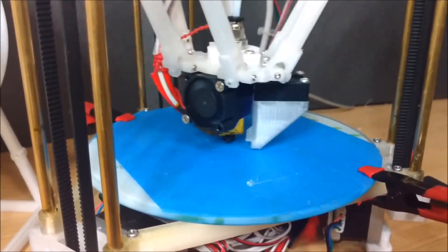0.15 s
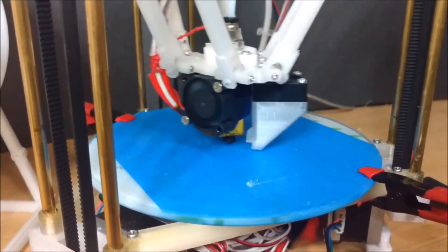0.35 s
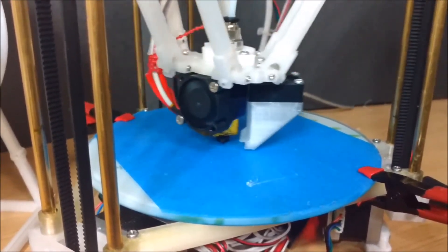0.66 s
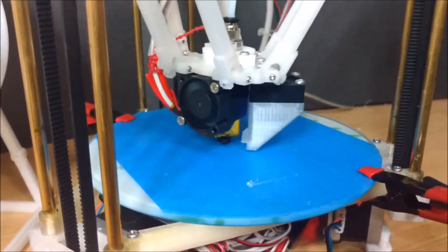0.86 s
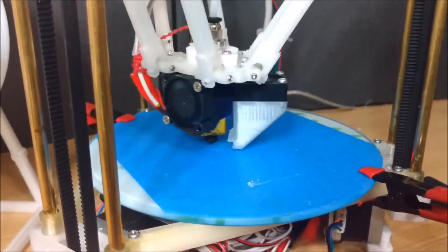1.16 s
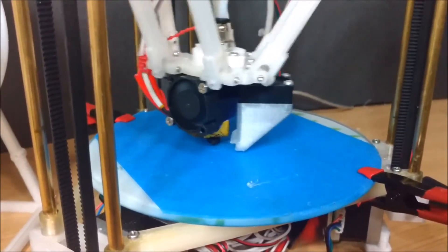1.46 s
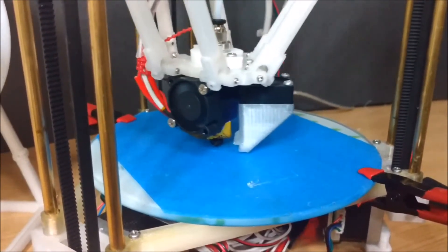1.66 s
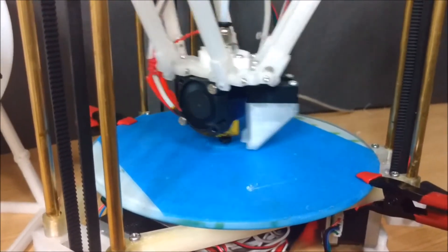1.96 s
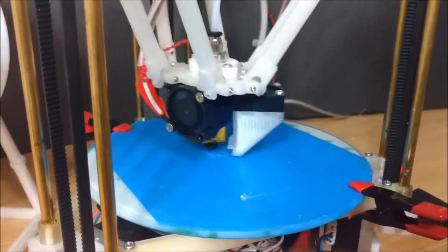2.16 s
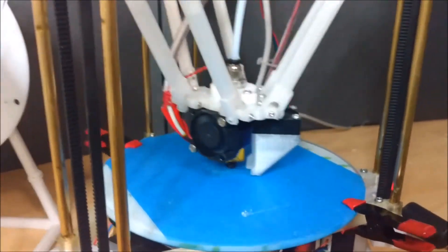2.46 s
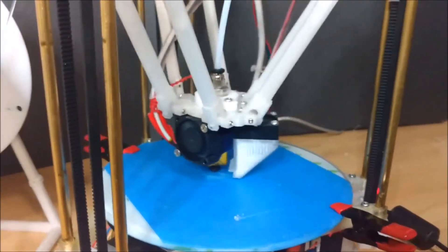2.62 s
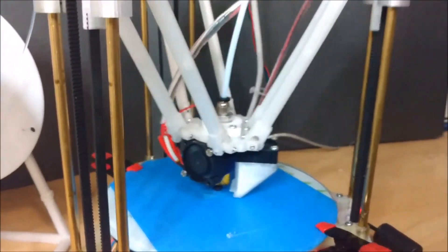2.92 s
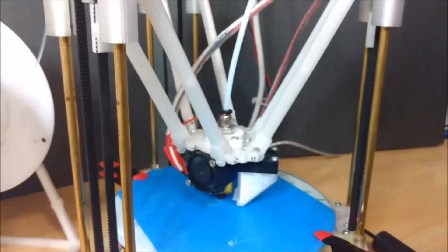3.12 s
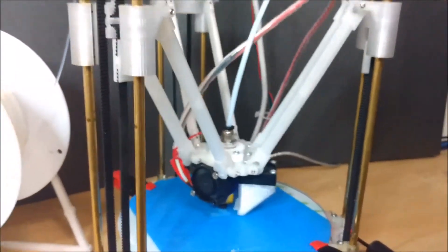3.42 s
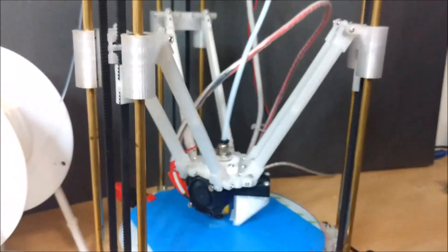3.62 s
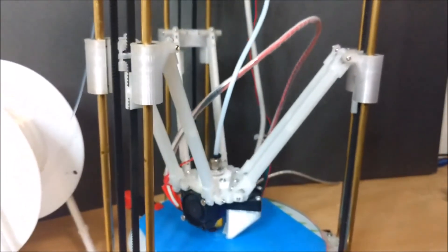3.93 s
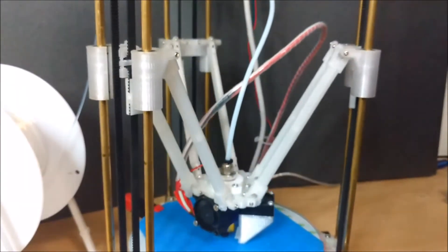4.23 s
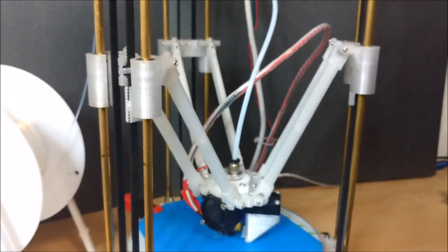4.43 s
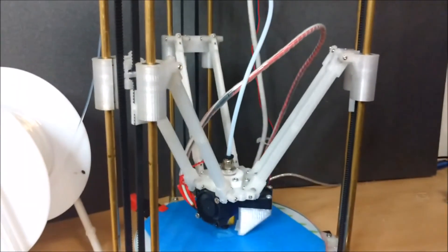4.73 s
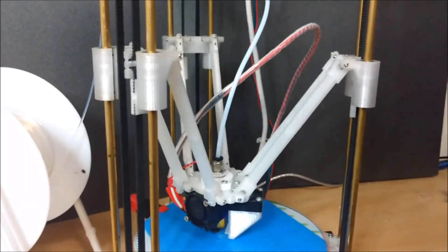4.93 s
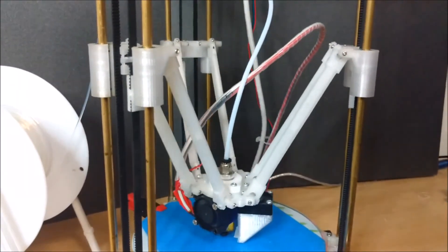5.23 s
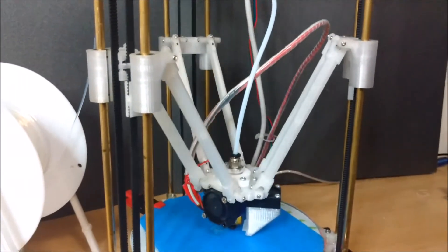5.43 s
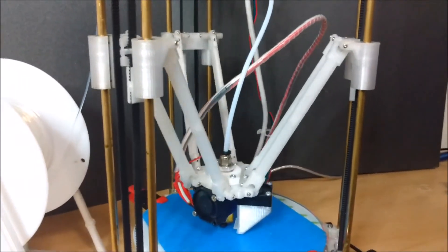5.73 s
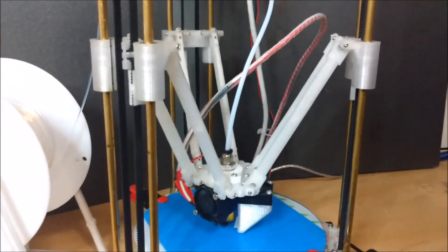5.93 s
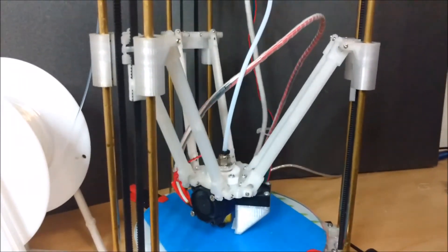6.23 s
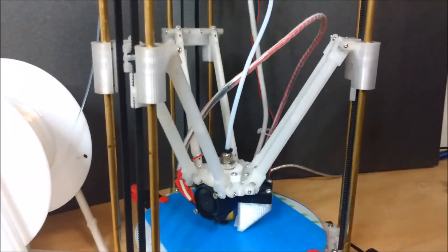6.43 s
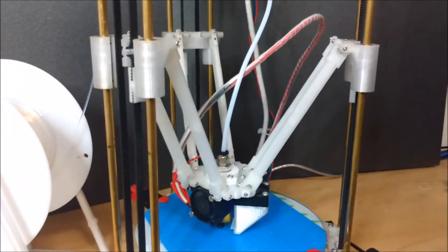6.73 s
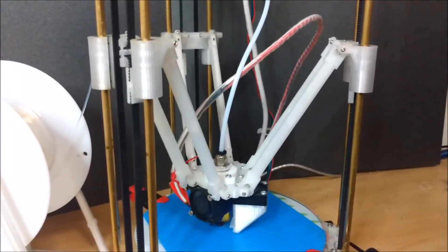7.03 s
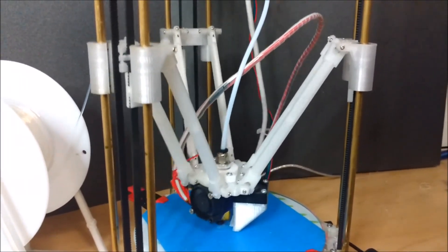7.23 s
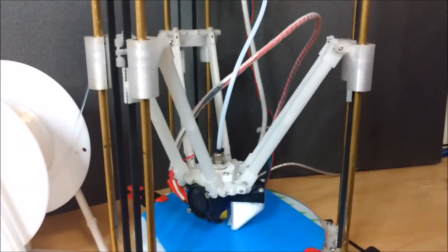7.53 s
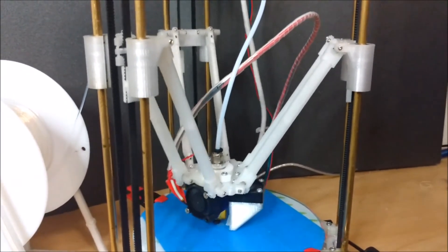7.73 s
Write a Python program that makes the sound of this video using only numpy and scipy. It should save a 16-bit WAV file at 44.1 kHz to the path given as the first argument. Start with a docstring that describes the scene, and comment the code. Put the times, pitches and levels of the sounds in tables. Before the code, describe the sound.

A small 3D printer is heard from close by in stereo, with a slight, short room tail and a constant soft fan hiss. From 0 to 1.6 s the head sweeps back and forth, seven strokes a second and quickening, each a booming low hum around 130-190 Hz with a grainy whirr, light rattle and ticks. After a short break, 1.95-2.5 s brings rattlier strokes with hard plastic snaps; another accelerating run lasts from 2.55 to 3.4 s. From 3.5 to 5.5 s only brief separate jerks occur over a low crawling hum, with thin whines near 1.4 and 3.1 kHz, clicks, and dull carriage knocks around 3.6 s. From 5.7 s to the end, at almost 8 s, steady fast strokes return, about eight a second, with less boom, brighter gliding whines, dense bearing rattle and the sharpest ticks, loudest around 6-6.8 s.

```python
"""A small delta printer fills a layer with quick back-and-forth strokes, heard from close by.
Motor cogging makes gliding tones that hum and boom with the frame; step pulses and belt friction whirr in the rods.
Random ball collisions rattle the linear bearings, joints tick with their play, and carriages knock now and then.
The motors crawl between strokes, narrow tones sing and whine, and a hot-end fan blows as filtered noise throughout."""
import sys
import numpy as np
from scipy import signal
from scipy.fft import rfft, irfft
from scipy.io import wavfile
from scipy.ndimage import uniform_filter1d, map_coordinates

SR = 44100
rng = np.random.default_rng(int(sys.argv[2]) if len(sys.argv) > 2 else 0)


def output_pcm(signal):
    """Save a mono or channel-first signal as 16-bit PCM at the path in sys.argv[1].

    Samples are clipped to [-1, 1] before scaling.
    """
    pcm = np.clip(np.atleast_2d(signal).T, -1, 1) * 32767
    wavfile.write(sys.argv[1], SR, np.round(pcm).astype(np.int16))


N = 347067

# Levels are relative wherever a mix gain follows in the functions.
# Zigzag fills with steadily changing strokes: first_middle_s, end_s, first_spacing_s, shortening_per_stroke_s
FILLS = [(0.020, 1.58, 0.1408, 0.0047), (1.953, 2.47, 0.1069, -0.0049), (2.549, 3.41, 0.1099, 0.0041),
         (5.735, 6.98, 0.1306, -0.0003), (7.055, 7.92, 0.1257, 0.0034)]
# Drive of each fill: turn_dwell_s, top_cogging_hz, hum_db, whirr_db, rattle_db, easing_per_stroke_db,
# return_stroke_db, mid_stroke_db; the last three act on whirr and rattle only
DRIVES = [(0.046, 186, -45, -41, -36, -0.08, 1.5, -2.5), (0.027, 190, -43, -35, -28, 2.5, 0, 2),
          (0.038, 190, -48, -43, -32, 0.0, -4, -3), (0.012, 224, -42, -39.5, -32.5, 0.0, -1.5, -4),
          (0.021, 220, -43, -40.5, -32, -0.1, -3.5, -0.5)]
# Single short moves between the fills: middle_s, length_s, level_db
MOVES = [(1.63, 0.09, -50), (3.507, 0.062, -44.5), (3.723, 0.0737, -37.5), (4.061, 0.072, -72),
         (4.141, 0.033, -36.5), (4.266, 0.071, -54), (4.479, 0.056, -42), (4.789, 0.0443, -38),
         (5.237, 0.045, -44.5), (5.337, 0.065, -39), (5.434, 0.062, -48)]
MOVE_TOP_HZ, MOVE_MIX_DB = 146.23, (-13, -12, -0.5)   # cogging rate; hum, whirr and rattle
FULL_SPEED_S = 0.046   # shorter strokes stay below their top cogging rate
SPEED_UP_S, BRAKE_S = 0.021, 0.03
HUM_LAG_S = 0.00304   # the frame takes a moment to follow the motors
# Effort of the slow running under the strokes: time_s, level_db
CRAWL = [(0.0, -42), (1.7, -42), (2.2, -43.5), (2.37, -50), (2.6, -42.5), (3.95, -44), (4.36, -44.5),
         (4.42, -53), (4.5, -43.5), (5.6, -43), (5.9, -45.5), (6.8, -45.5), (7.87, -42)]
CRAWL_MIX_DB, CRAWL_UNEVEN_DB = (1, 0.02, -1.1), 1.44   # hum, whirr and rattle; random unevenness
CRAWL_LENGTHWISE_DB = -3   # it hums less between lengthwise strokes
# Turn toward the crosswise fill, where another tower leads: time_s, crosswise_share (0-1)
DIRECTION = [(0, 0), (3.3, 0.3), (3.9, 0.66), (5.6, 0.81), (5.7, 0.82), (7.87, 0.87)]

# Resonances of frame and bed: pitch_hz, width_hz, lengthwise_db, crosswise_db
FRAME = [(133.9, 10.5, 3.5, -4.5), (182.5, 35, 6.5, -2), (238, 29, -26, -1.5), (261, 47, -5, -4),
         (331.7, 26, -10.5, -5.5)]
# Booms of the frame at its main resonance: peak_s, level_db
THUMPS = [(0.022, -36), (0.16, -33), (0.302, -33.5), (0.429, -29.5), (0.556, -38.5), (0.671, -34),
          (0.794, -35.0), (0.904, -33.5), (1.008, -40.0), (1.1, -38.0), (1.195, -36.0), (1.289, -36.0),
          (1.377, -37.0), (1.546, -41.0), (1.983, -37.5), (2.084, -36.5), (2.199, -39.5), (2.312, -34),
          (2.435, -36.5), (2.539, -38.5), (2.665, -34), (2.78, -36.5), (2.865, -36.0), (2.965, -35.0),
          (3.053, -37.5), (3.143, -38), (3.221, -39.5), (3.301, -39.5), (5.729, -39), (5.843, -45.5),
          (6.015, -35.5), (6.106, -38), (6.298, -33.5), (6.371, -40), (6.558, -37.5), (6.663, -36),
          (6.818, -35), (6.928, -37.0), (7.078, -35.0), (7.179, -41.0), (7.335, -40.5), (7.401, -43),
          (7.547, -42), (7.625, -41), (7.769, -38.5), (7.85, -39)]
THUMP_HALF_WIDTH_S, THUMP_HZ, THUMP_PULL = .026, 190.2, .75   # pull: how far the note draws the tone to it
# Motors of the three towers: cogging_rate_ratio, level_db
MOTORS = [(1.0, 1), (1.7, -3), (3.0, -5.5)]
# Resonances of rods and arms: pitch_hz, width_hz, lengthwise_db, crosswise_db
RODS = [(399.6, 26, 1.5, -30), (445, 37, -3, -2.5), (546, 47, -3.5, -4), (647.6, 42, 2.3, -2),
        (779, 140, -8, -6.5), (949, 140, -4, -6), (1076, 38, -2, 2), (1161, 23, 1.5, 0.5),
        (1244, 107, -2, -5), (1371, 78, 1.5, 1), (1479, 107, 1.5, 0.5), (1594, 124, -2.5, -4.5),
        (1756, 62, -6.5, -7), (2073, 110, -15.5, -15)]
ROD_WANDER, ROD_WANDER_PER_S, ROD_VARY_DB = .013, 16, 1   # pitch fraction, rate, strength

# Resonances of bearings and their plastic holders: pitch_hz, width_hz, lengthwise_db, crosswise_db
BEARINGS = [(2130, 1540, -4, -6.5), (2753, 354, 1.5, 3.5), (3038, 145, 3.5, 9), (3530, 215, 2, 1),
            (3905, 416, -3.5, -4.5), (5146, 850, -5, -5.5), (6060, 300, -6.5, -4.5), (7140, 680, -9.5, -10),
            (9300, 720, -16.5, -12), (10560, 5700, -25, -22), (13800, 4900, -33.5, -28.5)]
BALLS_PER_S, BALL_SLIDE_DB = 1500, -1.5   # average collision rate; sliding hiss against collisions
TEETH_PER_COG, TEETH_SLOW_DB, TEETH_FAST_DB = .45, 3.2, 2.1   # tooth rate ratio; depths of modulation
# A bearing sings on its rod: time_s, level_db
SINGING = [(0, -45.5), (4.17, -60.5), (4.25, -55), (4.34, -43), (4.39, -53.5), (5.6, -55), (5.75, -47.5),
           (7.87, -44.5)]
# Spectrum of the rushing air: pitch_hz, density_db (per Hz)
FAN = [(70, -25.5), (130, 7), (320, 0.5), (400, 0.5), (650, -3.5), (820, -7), (1100, -38), (1480, -5.5),
       (1950, -11), (3100, -2), (4800, -20), (7000, -26), (10000, -28), (15000, -37.5)]
# Blade tones: pitch_hz, level_db
FAN_TONES = [(1479, -55.5), (285, -56.5), (972, -58.5)]

# Single snaps of the ball joints, hard and soft, taking up their play: start_s, peak_db, brightness_db (per band)
TICKS = [(0.1301, -31, -2), (0.389, -20, -2), (0.395, -40, 5), (0.447, -21, 1), (0.4709, -21, -3),
         (0.5245, -18.5, -1), (0.5415, -23, 8), (0.6327, -24, 3), (0.872, -29, 7), (1.088, -21, -6),
         (1.1793, -24, 2), (1.2763, -19, 2), (1.733, -20.5, -3), (1.9097, -21, 0), (1.963, -18, -3),
         (2.0356, -24, 0), (2.156, -16, 0.5), (2.2767, -15, 0), (2.388, -23, -1), (2.477, -28, 5),
         (2.5222, -21, 0), (2.5861, -18, 0.5), (2.7504, -16.5, -3), (2.7535, -23, 2), (2.766, -22, 2),
         (2.9373, -20, -3), (2.964, -19, -4), (3.1213, -25, -1), (3.595, -26, 6), (3.647, -18, 1),
         (3.6965, -17, 0.5), (3.714, -19, 5), (3.9354, -27.5, -3), (4.2357, -26, 3), (4.6792, -31, -2),
         (4.778, -18.5, 0), (5.129, -21, 0), (5.159, -17, 0), (5.3245, -22.5, -2), (5.413, -25, 2),
         (5.4277, -33, 11), (5.4496, -31, 13), (5.5023, -28, -2), (5.533, -30, -2), (5.6778, -22, -2.5),
         (5.8298, -19, 3), (5.9438, -22, 1), (6.0905, -15, 1.5), (6.2133, -13.5, 4), (6.2718, -16, 4.5),
         (6.3548, -16, -1), (6.5313, -12, 2), (6.6205, -17, 0), (6.7465, -22, -4), (6.7848, -11.5, -0.5),
         (6.8255, -25, 4), (7.0133, -19, -4.5), (7.176, -20, 1), (7.2592, -20, -2), (7.283, -15, -1),
         (7.4997, -28, 6)]
# Edges of the bands that colour a tick: edge_hz
TICK_BANDS_HZ = (2700, 4900, 7500, 15000)
TICK_AFTER_S, TICK_SCATTER_S, TICK_DB = 0.02, 0.0055, -31.5   # a light tick after each stroke's start
STRAY_TICKS_PER_S, STRAY_TICK_DB, TICK_SPREAD_DB = 22, -34, 2   # random ticks; spread of all light ticks
REBOUNDS_PER_S = 1100
# Duller knocks of the carriages: start_s, peak_db
KNOCKS = [(0.526, -26), (3.595, -24), (3.602, -26), (3.617, -37), (3.702, -32), (6.819, -43)]
# Resonances of a knocked carriage: pitch_hz, level_db, t60_s
CARRIAGE = [(150, -7, 0.046), (220, 10, 0.026), (330, 0, .025), (470, -15, .015), (640, 10, 0.02),
            (796, -16, 0.009), (1260, -16, .02)]

# Brief singing of a rod or bearing in slow moves: peak_s, half_width_s, pitch_hz, level_db
WHINES = [(3.46, .025, 1070, -44), (3.501, .015, 1490, -38), (3.516, .014, 1357, -46),
          (3.632, .014, 1490, -41), (3.656, .014, 1360, -40), (3.731, .015, 1070, -44),
          (4.062, .028, 1500, -41.5), (4.244, .02, 3118, -38), (4.246, .015, 1410, -46),
          (4.316, .03, 3160, -40), (4.566, .02, 1374, -47), (4.842, .02, 1494, -37),
          (5.067, .018, 1350, -38), (5.176, .018, 1393, -40), (5.232, .018, 3110, -45),
          (5.425, .018, 1357, -44)]
# Rod resonances swept while speeding up and braking crosswise, outward and on the return:
# place (stroke lengths from its middle), pitch_hz, level_db
OUTWARD_SURGES = [(-0.25, 1100, -43), (-0.22, 1450, -39.5), (0.2, 1130, -38), (0.25, 1460, -35.5),
                  (0.27, 655, -46), (0.1, 450, -44)]
RETURN_SURGES = [(-0.22, 1465, -37.5), (-0.17, 1090, -41.5), (0.05, 547.6, -41.5), (0.248, 660, -50),
                 (0.3, 1100, -39)]
SURGE_HALF_WIDTH_S, SURGE_GLIDE = 0.013, 0.02334   # glide: pitch fraction per half width
SURGES_FROM_SHARE = .7   # least crosswise share at which strokes surge
WHINE_WOBBLE, WHINE_VARY, WHINE_VARY_DB = .008, .018, 2   # wavering and chance, as pitch fractions; strength

ROOM_T60_S = 0.15
# Stereo comb, opposite, regularly spaced dips in middle and side: pitch_hz, depth (0-1)
STEREO_COMB = [(1850, .0), (2130, .4), (2300, .93), (2400, 1), (2560, 1), (2800, .8), (3700, .9),
               (5000, .92), (10000, .92), (15000, .7)]
COMB_SPACING_HZ = 2470
NOTCH_HZ, NOTCH_WIDTH_HZ, NOTCH_DB = 2470, 130, -7   # a narrow dip in the middle signal
CUTOFF_HZ = 15500


def from_db(db):
    """Logarithmic level: decibels to amplitude gain."""
    return 10 ** (np.asarray(db) / 20)


def rms_one(x):
    """Mean power: scale a signal to unit power."""
    return x / np.sqrt(np.mean(x ** 2) + 1e-20)


def in_time(rows):
    """Linear interpolation: one curve per column, at every sample."""
    s, *columns = np.transpose(rows)
    return np.array([np.interp(np.arange(N) / SR, s, column) for column in columns])


def at_hz(points, hz):
    """Logarithmic pitch: read a table on a log-frequency axis."""
    pitch_hz, value = np.transpose(points)
    return np.interp(np.log(hz + 1), np.log(pitch_hz), value)


def band(x, low_hz, high_hz, order=2):
    """Filtering: a causal band-pass."""
    edges = [low_hz, min(high_hz, .45 * SR)]
    return signal.sosfilt(signal.butter(order, edges, "band", fs=SR, output="sos"), x)


def noise():
    """White noise: two unrelated signals of equal power at all frequencies."""
    return rng.standard_normal((2, N))


def drift(rate):
    """Slow random modulation: smoothed chance values, `rate` per second, with unit power."""
    knots = np.arange(N // 16 + 2) * 16 * rate / SR
    slow = map_coordinates(rng.standard_normal(4096), [knots], order=2, mode="wrap")
    return rms_one(np.interp(np.arange(N) * rate / SR, knots, slow))


def pair(x, side_db):
    """Stereo decorrelation: two signals become the middle and side of a left-right pair."""
    middle, side = x[0], from_db(side_db) * x[1]
    return np.array([middle + side, middle - side]) / np.sqrt(1 + from_db(side_db) ** 2)


def around(s, width_s):
    """Local envelope: the samples of a brief swell and their distance from its peak in half widths."""
    now = np.arange(max(0, int((s - 3 * width_s) * SR)), min(N, int((s + 3 * width_s) * SR)))
    return now, (now / SR - s) / width_s


def crosswise_share():
    """Modal weighting: the crosswise part of the motion at every sample."""
    return np.clip(in_time(DIRECTION)[0], 0, 1)


def body(modes, crosswise):
    """Modal superposition: the unit-energy impulse response of parallel, alternately signed resonances."""
    t = np.arange(SR // 5) / SR   # long enough for the narrowest mode
    response = np.zeros(len(t))
    for k, (hz, width, *levels) in enumerate(modes):
        decay = width * np.exp(-np.pi * width * t)
        response += (-1) ** k * from_db(levels[crosswise]) * decay * np.cos(2 * np.pi * hz * t)
    return response / np.linalg.norm(response)


def shake(drive, modes, low_hz, high_hz, order=2):
    """Forced vibration: a body filters its drive, and the fill direction weights its modes."""
    share = crosswise_share()
    directions = []
    for k in range(2):
        response = band(body(modes, k), low_hz, high_hz, order=order)
        response /= np.linalg.norm(response)
        directions.append(signal.oaconvolve(drive, response[None])[:, :N])
    lengthwise, crosswise = directions
    return (1 - share) * lengthwise + share * crosswise


def strokes():
    """Reciprocating motion: unroll fills into strokes with their drive settings."""
    # rows: middle_s, length_s, returning (0 or 1), top_hz, mid_stroke_db, hum_db, whirr_db, rattle_db
    rows = []
    for (first, end, spacing, shortening), drive in zip(FILLS, DRIVES):
        dwell, top_hz, hum_db, whirr_db, rattle_db, easing_db, return_db, mid_db = drive
        for k in range(20):
            middle = first + k * (spacing - shortening * k / 2)
            length = spacing - shortening * k - dwell
            if middle > end or length <= 0:
                break
            load_db = return_db * (k % 2) - easing_db * k
            levels = hum_db, whirr_db + load_db, rattle_db + load_db
            rows.append((middle, length, k % 2, top_hz, mid_db, *levels))
    return rows


def motion(crawl_hz, coast_after_s):
    """Acceleration and braking: each stroke shapes the cogging rate and the hum, whirr and rattle."""
    t = np.arange(N) / SR
    crawl_db = in_time(CRAWL)[0]
    strengths = np.array([from_db(crawl_db + db + CRAWL_UNEVEN_DB * drift(35)) for db in CRAWL_MIX_DB])
    strengths[0] *= from_db(CRAWL_LENGTHWISE_DB * (1 - crosswise_share()))
    cog_hz = np.full(N, float(crawl_hz))
    moves = [(s, length, 0, MOVE_TOP_HZ, 0, *(db + np.array(MOVE_MIX_DB))) for s, length, db in MOVES]
    for middle, length, _, top_hz, mid_db, *levels in strokes() + moves:
        start, end = middle - length / 2, middle + length / 2
        now = slice(max(0, int(start * SR)), int(end * SR))
        ramp = np.clip(np.minimum((t[now] - start) / SPEED_UP_S, (end - t[now]) / BRAKE_S), 0, 1)
        swing = np.abs(np.cos(np.pi * (t[now] - middle) / length))
        stroke = from_db(levels)[:, None] * ramp
        stroke[0] *= swing
        if length > coast_after_s:   # the belts' load changes while coasting through the middle
            stroke[1:] *= from_db(mid_db * swing ** 8)
        strengths[:, now] += stroke
        cog_hz[now] += (top_hz - crawl_hz) * min(1, length / FULL_SPEED_S) * swing ** .8
    lagged_hz = np.interp(t - HUM_LAG_S, t, cog_hz)
    lagged_hum = np.interp(t - HUM_LAG_S, t, strengths[0])
    return lagged_hz, lagged_hum, strengths[1], strengths[2]


def hum(cog_hz, strength, tone_db, second_db, second_ratio, high_db, high_ratio,
        shake_db, thump_shake_db, wobble):
    """Cogging and resonance: motor tones boom and pull toward the frame's note, with noisy shuddering."""
    crosswise, thump = crosswise_share(), np.zeros(N)
    for s, db in THUMPS:
        now, passing = around(s, THUMP_HALF_WIDTH_S)
        thump[now] += from_db(db) * np.exp(-np.abs(passing) ** 3)
    hz = cog_hz + THUMP_PULL * thump / (thump + strength) * (THUMP_HZ - cog_hz)
    phase = 2 * np.pi * np.cumsum(hz * (1 + wobble * drift(60))) / SR
    # the leading motor is later and weaker in the left channel; the level gap is widest lengthwise
    channel_gain = from_db(np.array([[-3], [1.5]]) * (1 - .8 * crosswise))
    tone = np.sqrt(2) * np.sin(phase - np.array([[.7], [0]])) * channel_gain
    # on the crosswise fill a second motor runs faster than the first
    second_hz = second_ratio * cog_hz * (1 + wobble * drift(50))
    second = np.sqrt(2) * np.sin(2 * np.pi * np.cumsum(second_hz) / SR)
    # on the lengthwise fill the fastest motor adds a higher note
    high = np.sqrt(2) * np.sin(high_ratio * phase + drift(70))
    upper = from_db(second_db) * crosswise * second + from_db(high_db) * (1 - crosswise) * high
    force = (strength + from_db(thump_shake_db) * thump) * pair(noise(), side_db=-7.0)
    shudder = from_db(shake_db + 1.25 * crosswise) * shake(force, FRAME, 113, 460, order=4)
    return (thump + from_db(tone_db) * strength) * tone + (thump + strength) * upper + shudder


def swinging_rods(drive):
    """Time-varying resonance: the rods' modes wander in pitch and strength as they swing with the head."""
    share = crosswise_share()
    modes = np.array(RODS)
    gains = from_db(modes[:, 2:])
    gains /= np.sqrt(np.sum(gains ** 2 * modes[:, 1:2], axis=0))
    out = np.zeros(N)
    for k, ((hz, width), (lengthwise, crosswise)) in enumerate(zip(modes[:, :2], gains)):
        wandering_hz = hz * (1 + ROD_WANDER * drift(ROD_WANDER_PER_S))
        turning = np.exp(2j * np.pi * np.cumsum(wandering_hz) / SR)
        # shift the mode to zero frequency, let it ring, and shift it back
        envelope = signal.lfilter([width], [1, -np.exp(-np.pi * width / SR)], drive * turning.conj())
        ringing = (turning * envelope).real
        gain = lengthwise + share * (crosswise - lengthwise)
        out += (-1) ** k * ringing * gain * from_db(ROD_VARY_DB * drift(ROD_WANDER_PER_S))
    return rms_one(band(out, 390, 2360)) * drive.std()


def whirr(cog_hz, strength, steps_db, belt_db, jitter):
    """Impulsive and frictional excitation: steps of three motors and rubbing belts drive rods and arms."""
    steps = np.zeros(N)
    for ratio, level_db in MOTORS:
        turns = np.cumsum(ratio * cog_hz * (1 + jitter * drift(40))) / SR
        steps += from_db(level_db) * rms_one(np.diff(np.floor(turns), prepend=0))
    rubbing = from_db(belt_db) * rng.standard_normal(N) * from_db(2.48 * drift(250))
    drive = rubbing + from_db(steps_db) * rms_one(steps - steps.mean())
    return swinging_rods(strength * drive)


def belt_teeth(cog_hz, jitter):
    """Periodic modulation: belt teeth jolt the carriage, more deeply when slow; mean power is 1."""
    phase = 2 * np.pi * np.cumsum(TEETH_PER_COG * cog_hz * (1 + jitter * drift(50))) / SR
    depth_db = np.interp(cog_hz, [cog_hz.min(), THUMP_HZ], [TEETH_SLOW_DB, TEETH_FAST_DB])
    return rms_one(from_db(depth_db * (np.sin(phase) + .5 * np.sin(2 * phase))))


def rattle(strength, level_db, per_s, spread_db, slide_db, flutter_db):
    """Random impacts: balls collide more often when driven harder, over a smooth sliding hiss."""
    pace = strength / strength.mean()
    hits = rng.random(N) < per_s * pace / SR
    sizes = from_db(spread_db * np.minimum(rng.exponential(1, N), 4))
    balls = rms_one(hits * sizes * noise() / np.sqrt(pace))
    drive = rms_one((balls + from_db(slide_db) * noise()) * from_db(flutter_db * drift(160)))
    ringing = shake(strength * pair(drive, side_db=0.0), BEARINGS, 1730, 19000)
    # harder and softer collisions make the brightness wander
    hardness_db = 2.9 * drift(45)
    dull = uniform_filter1d(ringing, size=5)
    bright = ringing - dull
    return from_db(level_db) * (dull * from_db(-.4 * hardness_db) + bright * from_db(hardness_db))


def singing(hz, width_hz):
    """Friction-driven resonance: sliding noise keeps one narrow mode of a bearing ringing."""
    friction = pair(noise(), side_db=-18)
    ringing = band(friction, hz - width_hz / 2, hz + width_hz / 2, order=1)
    return from_db(in_time(SINGING)[0]) * rms_one(ringing)


def fan(air_db, waver, rumble_db):
    """Turbulence and blade passing: coloured noise with wavering tones, over a faint rumble."""
    colour = from_db(at_hz(FAN, np.arange(N // 2 + 1) * SR / N))
    air = rms_one(irfft(rfft(pair(noise(), side_db=-2.0)) * colour, N))
    seconds = np.cumsum(1 + waver * drift(25)) / SR   # a wavering clock shared by the tones
    tones = np.zeros(N)
    for hz, db in FAN_TONES:
        tones += np.sqrt(2) * from_db(db + 3.0 * drift(10)) * np.sin(2 * np.pi * hz * seconds)
    rumble = rms_one(band(pair(noise(), side_db=-4.0), 24, 100))
    return from_db(air_db) * air + tones + from_db(rumble_db) * rumble


def light_ticks(strength):
    """Backlash: joints tick soon after each stroke begins, and at random more often as rattling grows."""
    rows = []
    for middle, length, *_ in strokes():
        late, hard = rng.standard_normal(2)
        start = middle - length / 2 + TICK_AFTER_S + TICK_SCATTER_S * late
        rows.append((start, TICK_DB + TICK_SPREAD_DB * hard))
    pace = strength / strength.mean()
    strays = np.flatnonzero(rng.random(N) < STRAY_TICKS_PER_S * pace / SR)
    stray_db = STRAY_TICK_DB + 10 * np.log10(pace) + TICK_SPREAD_DB * rng.standard_normal(N)
    rows += zip(strays / SR, stray_db[strays])
    return [(s, db, 0) for s, db in rows if 0 < s < N / SR]   # columns as in TICKS


def joint_ticks(events, level_db, side_db, chatter_s, vary_db):
    """Impact and rebound: a joint snaps and chatters, ringing the holders with a varying colour."""
    s, db, bright_db = np.transpose(events)
    at, holders = (s * SR).astype(int), body(BEARINGS, 0)
    peak = np.abs(band(holders, TICK_BANDS_HZ[0], TICK_BANDS_HZ[-1], order=1)).max()
    signs = rng.choice([-1, 1], (2, N))
    rebounds = .6 * (rng.random(N) < REBOUNDS_PER_S / SR) * rng.uniform(-1, 1, (2, N))
    out = np.zeros((2, N))
    for k, (low, high) in enumerate(zip(TICK_BANDS_HZ, TICK_BANDS_HZ[1:])):
        clicks = np.zeros(N)
        varied_db = vary_db * rng.standard_normal(N)[at]
        clicks[at] = from_db(db + level_db + bright_db * (k - 1) + varied_db)
        settling = signal.lfilter([1], [1, -np.exp(-1 / (chatter_s * SR))], clicks + 1e-18)
        drive = pair(signs * clicks + settling * rebounds, side_db)
        out += signal.oaconvolve(drive, band(holders, low, high)[None] / peak)[:, :N]
    return out


def carriage_knocks():
    """Impulse response: each compact blow dies away in the carriage's few modes."""
    t = np.arange(SR // 5) / SR
    ringing = sum(from_db(db - 60 * t / t60) * np.sin(2 * np.pi * hz * t) for hz, db, t60 in CARRIAGE)
    response = band(ringing, 140, 1500, order=3)
    clicks, (s, db) = np.zeros(N), np.transpose(KNOCKS)
    clicks[(s * SR).astype(int)] = from_db(db)
    return signal.oaconvolve(clicks, response / np.abs(response).max())[:N]


def whine_rows():
    """Resonance crossing: crosswise strokes add whines gliding up before mid-stroke and down after it."""
    rows = [(*row, 0) for row in WHINES]   # columns as in WHINES, plus glide
    for middle, length, returning, *_ in strokes():
        if np.interp(middle, *np.transpose(DIRECTION)) >= SURGES_FROM_SHARE:
            for place, hz, db in RETURN_SURGES if returning else OUTWARD_SURGES:
                sharp, loud = rng.standard_normal(2)
                varied_hz = hz * (1 + WHINE_VARY * sharp)
                varied_db = db + WHINE_VARY_DB * loud
                glide = -np.sign(place) * SURGE_GLIDE
                rows.append((middle + place * length, SURGE_HALF_WIDTH_S, varied_hz, varied_db, glide))
    return rows


def surges():
    """Narrow resonance: brief swells of nearly pure whine, returned with their summed strength."""
    whine, swell, waver = np.zeros(N), np.zeros(N), WHINE_WOBBLE * drift(200)
    for s, width_s, hz, db, glide in whine_rows():
        now, passing = around(s, width_s)
        strength = from_db(db) * np.exp(-passing ** 2)
        gliding_hz = hz * (1 + glide * passing + waver[now])
        whine[now] += strength * np.sin(2 * np.pi * np.cumsum(gliding_hz) / SR)
        swell[now] += strength
    return whine, swell


def room(x, wet_db):
    """Reverberation: a short diffuse tail from the desk corner, different at each side."""
    t = np.arange(SR // 3) / SR
    diffuse = band(rng.standard_normal((2, len(t))), 114, 13700, order=1)
    tail = diffuse * from_db(-60 * t / ROOM_T60_S) * (t > .004)
    tail /= np.linalg.norm(tail, axis=1, keepdims=True)
    return x + from_db(wet_db) * signal.oaconvolve(x, tail, axes=1)[:, :N]


def scene():
    """Superposition: the moving machine in its room, and the fan."""
    cog_hz, hum_gain, whirr_gain, rattle_gain = motion(crawl_hz=135.04, coast_after_s=.09)
    whine, swell = surges()
    frame = hum(cog_hz, hum_gain, tone_db=-8.5, second_db=-11.0, second_ratio=1.36, high_db=-15.0,
                high_ratio=3.55, shake_db=-2.0, thump_shake_db=-10.5, wobble=0.01594)
    # the whines also stir the rods and bearings
    rods = whirr(cog_hz, whirr_gain + from_db(-18.0) * swell, steps_db=-4.5, belt_db=-2.0, jitter=.03)
    rods += whine
    bearing_drive = (rattle_gain + from_db(-12.5) * swell) * belt_teeth(cog_hz, jitter=.2)
    bearings = rattle(bearing_drive, level_db=-1.78, per_s=BALLS_PER_S, spread_db=0.5,
                      slide_db=BALL_SLIDE_DB, flutter_db=1.22)
    pace = rattle_gain / uniform_filter1d(rattle_gain, SR // 4)
    bearings += pace * singing(hz=3078, width_hz=150)
    events = TICKS + light_ticks(rattle_gain)
    ticks = joint_ticks(events, level_db=-2.5, side_db=-2.5, chatter_s=0.0096, vary_db=3.2)
    carriages = (bearings + ticks) * from_db([[-.4], [.4]])   # a little to the right
    machine = frame + rods + carriages + carriage_knocks()
    return room(machine, wet_db=-16.5) + fan(air_db=-43.5, waver=0.00617, rumble_db=-75.5)


def record(dry):
    """Stereo comb filtering: regular dips fall oppositely in middle and side, and the top is cut."""
    hz = np.arange(N // 2 + 1) * SR / N
    comb = np.clip(at_hz(STEREO_COMB, hz), 0, 1) * np.cos(2 * np.pi * hz / COMB_SPACING_HZ)
    notch = from_db(NOTCH_DB * np.exp(-((hz - NOTCH_HZ) / NOTCH_WIDTH_HZ) ** 2))
    mid = irfft(rfft(dry[0] + dry[1]) * np.sqrt(1 - comb) * notch, N) / 2
    side = irfft(rfft(dry[0] - dry[1]) * np.sqrt(1 + comb), N) / 2
    low_pass = signal.ellip(10, .1, 90, CUTOFF_HZ, fs=SR, output="sos")
    return signal.sosfilt(low_pass, [mid + side, mid - side])


dry = scene()
out = record(dry)
output_pcm(out)
```